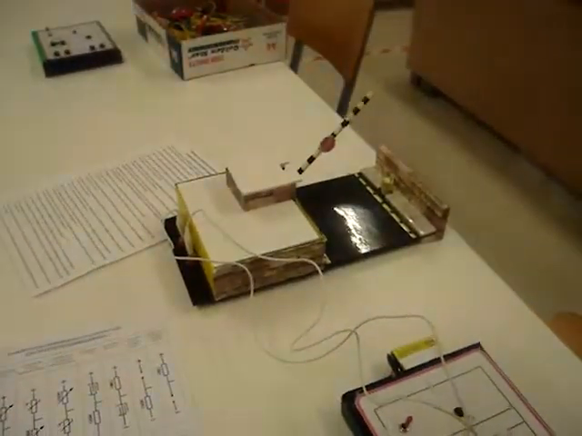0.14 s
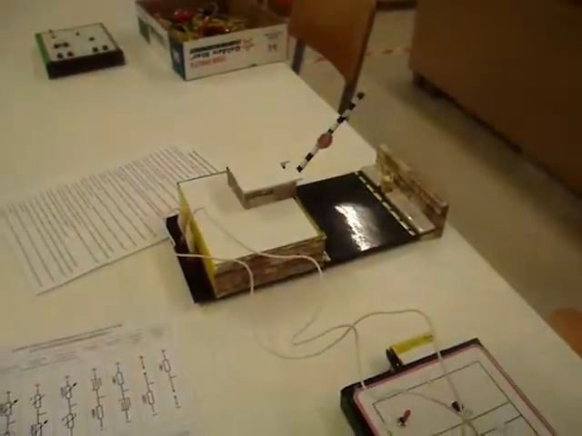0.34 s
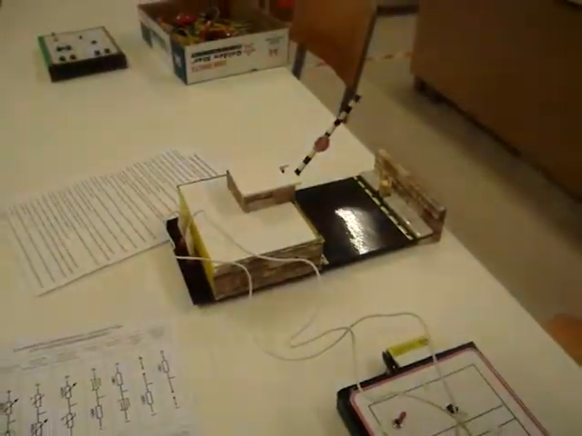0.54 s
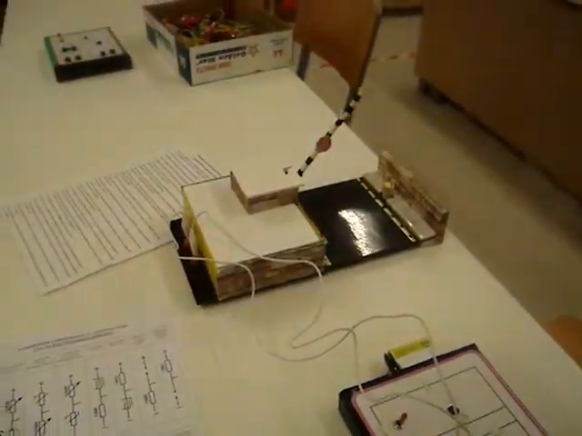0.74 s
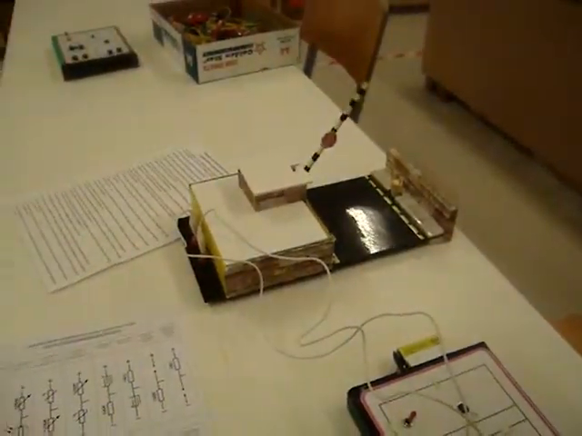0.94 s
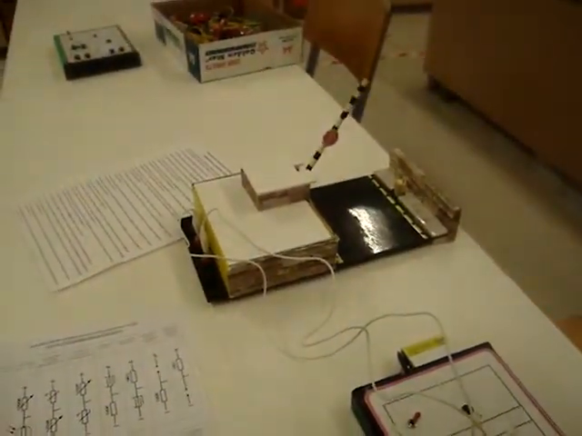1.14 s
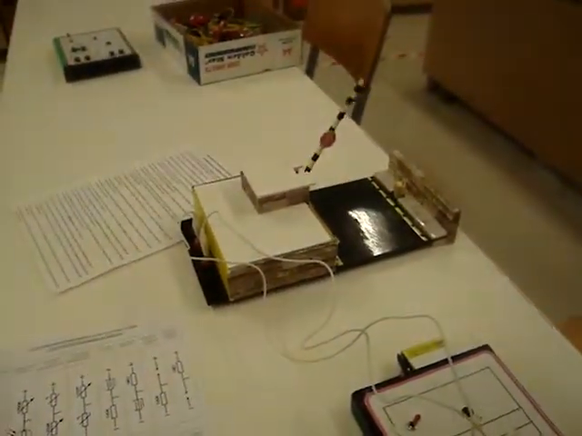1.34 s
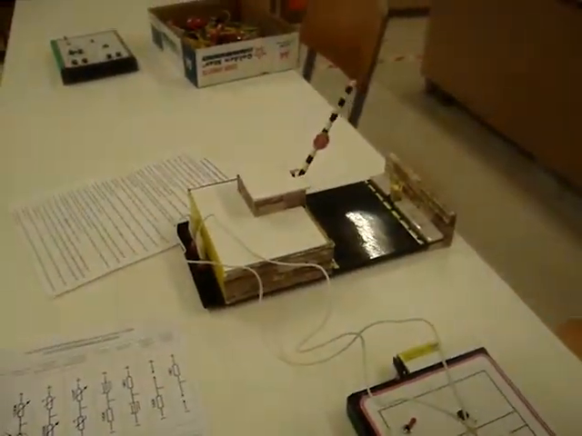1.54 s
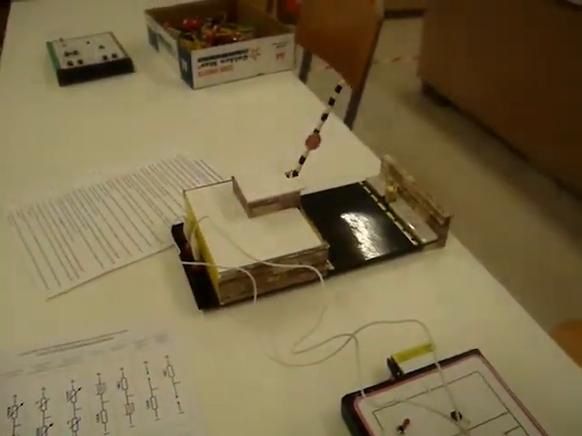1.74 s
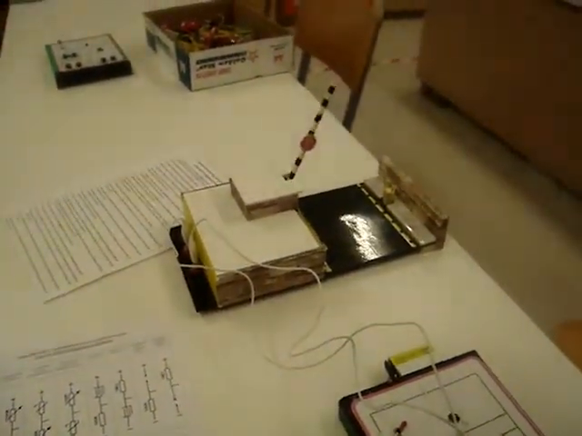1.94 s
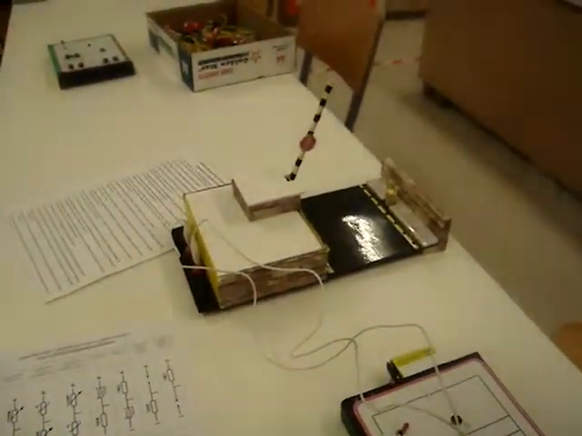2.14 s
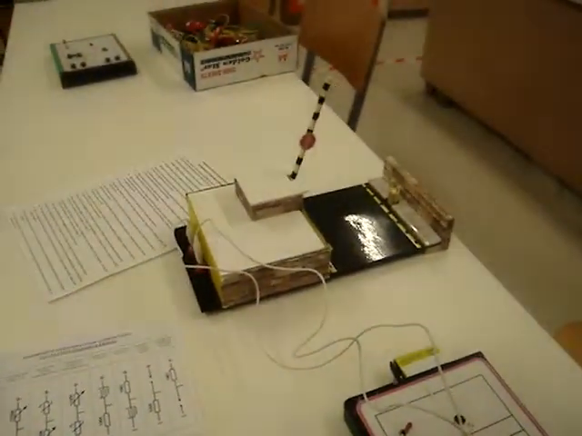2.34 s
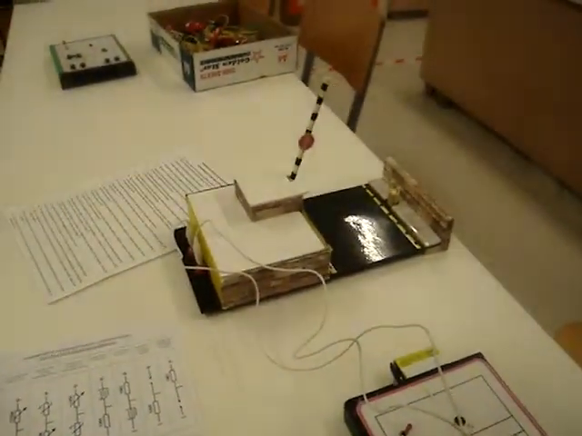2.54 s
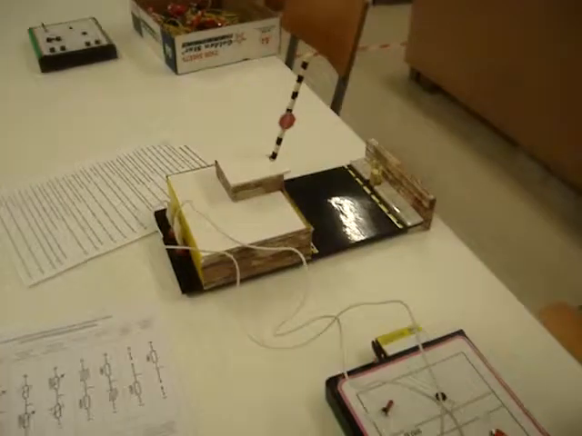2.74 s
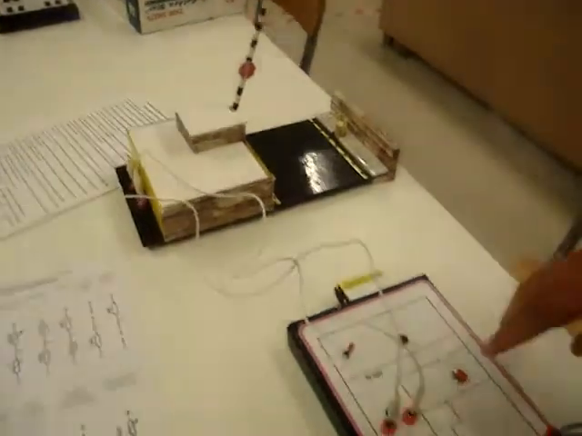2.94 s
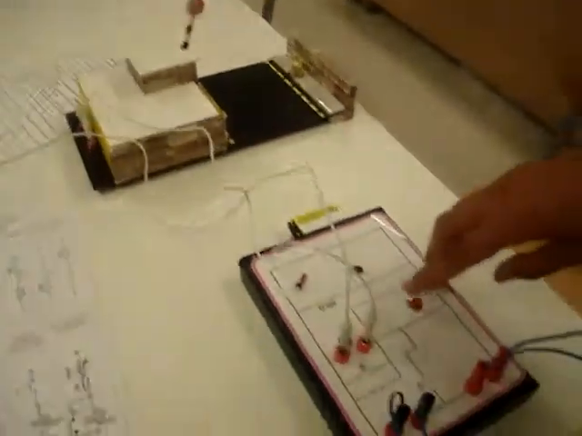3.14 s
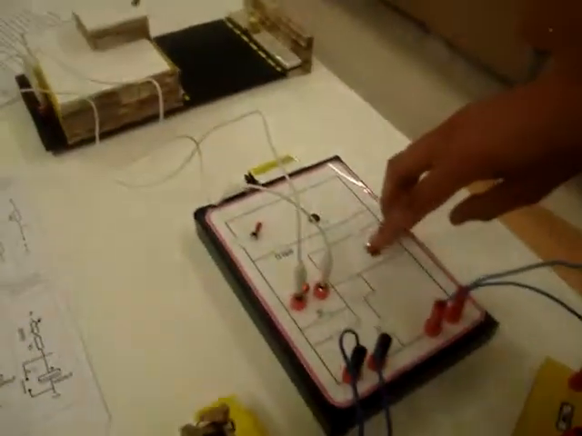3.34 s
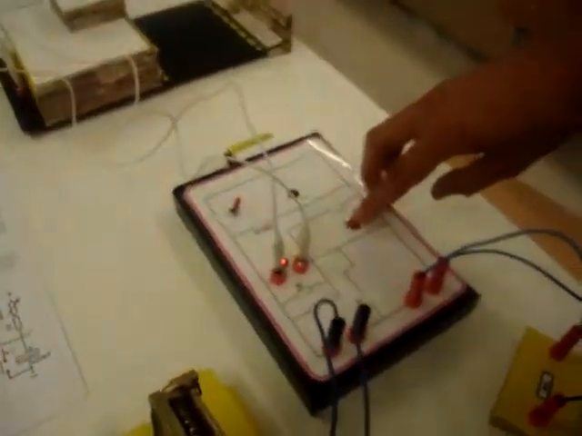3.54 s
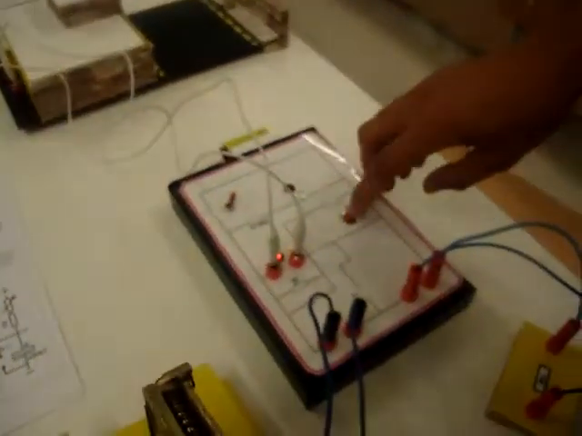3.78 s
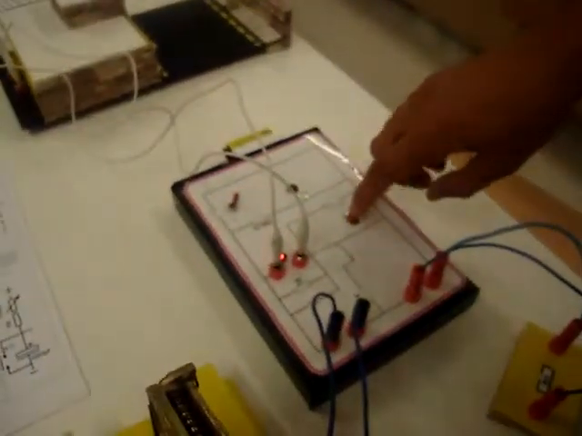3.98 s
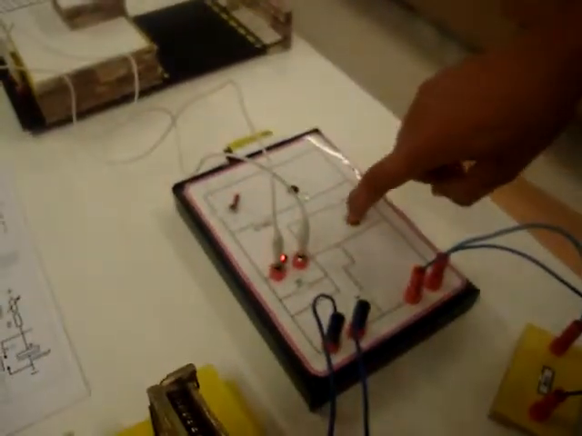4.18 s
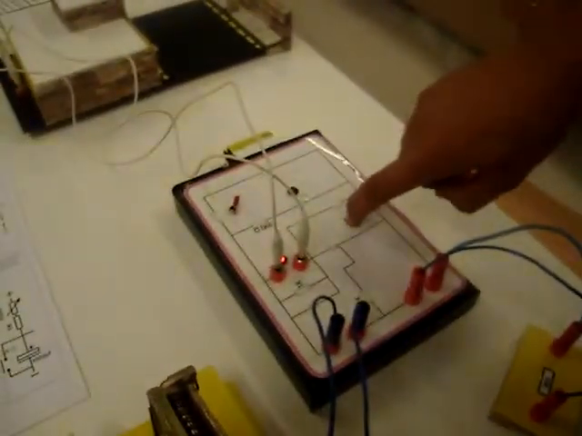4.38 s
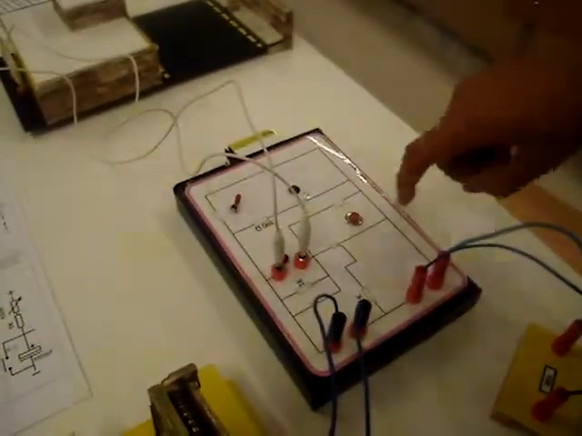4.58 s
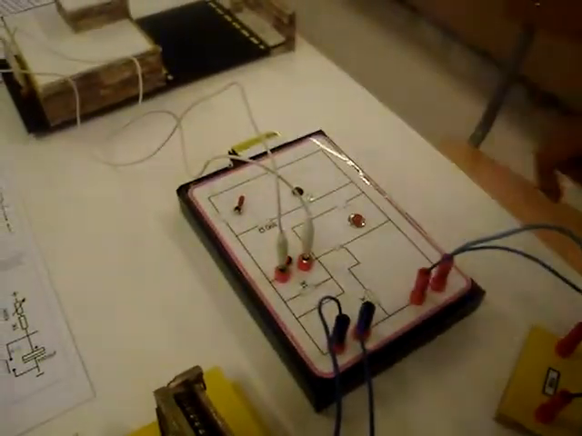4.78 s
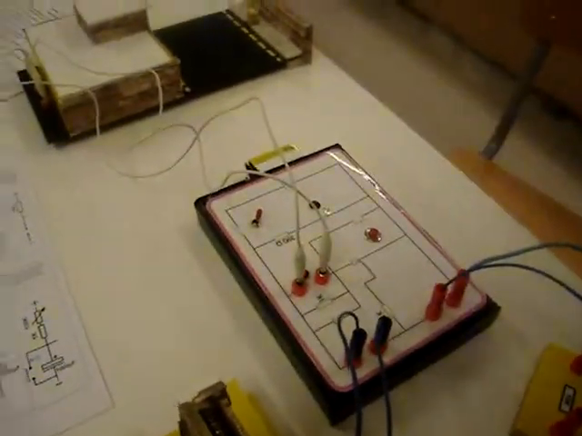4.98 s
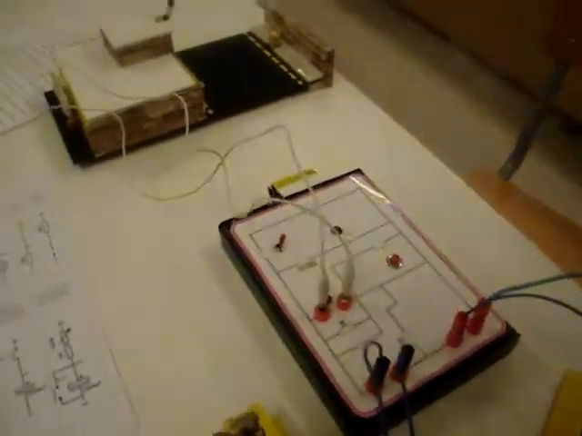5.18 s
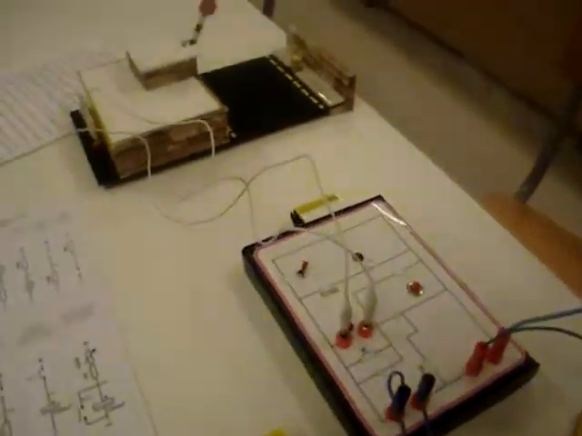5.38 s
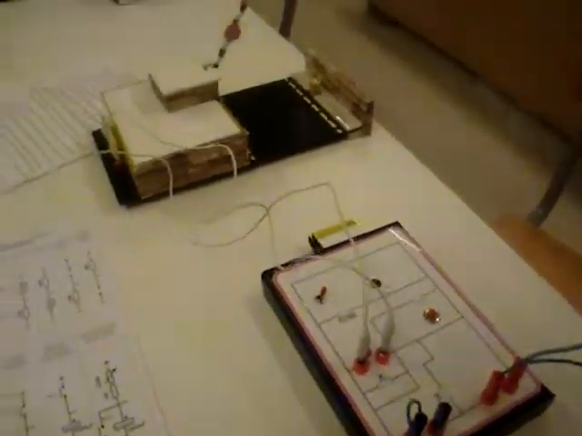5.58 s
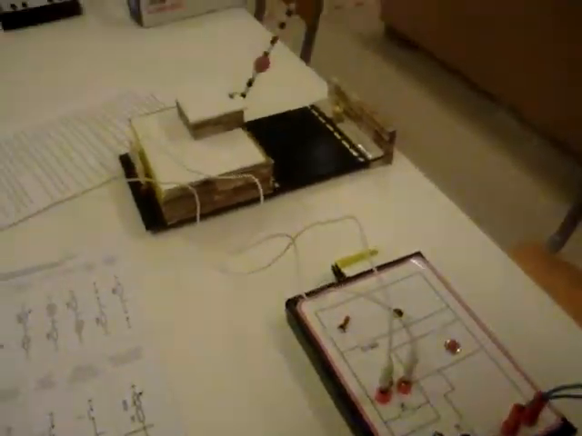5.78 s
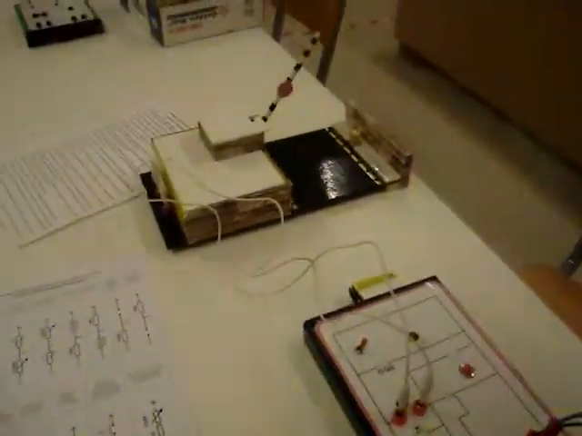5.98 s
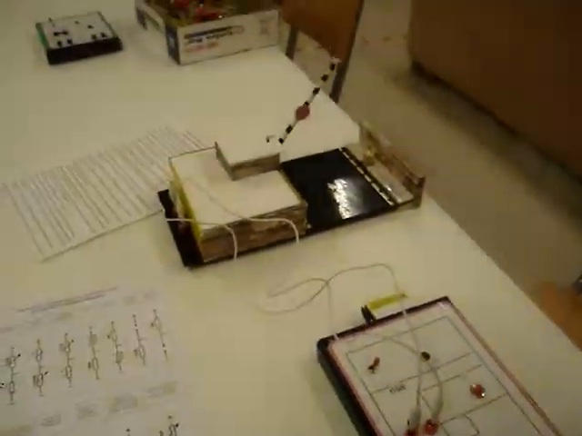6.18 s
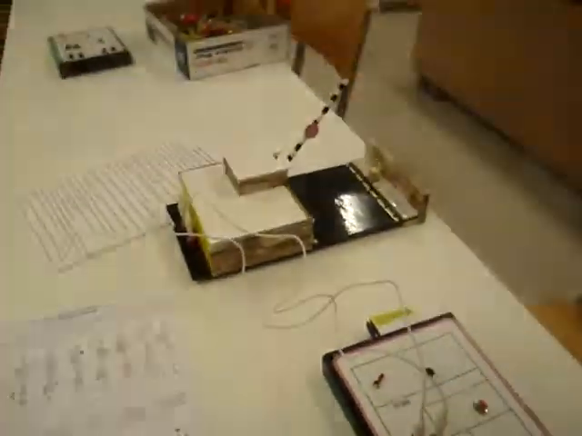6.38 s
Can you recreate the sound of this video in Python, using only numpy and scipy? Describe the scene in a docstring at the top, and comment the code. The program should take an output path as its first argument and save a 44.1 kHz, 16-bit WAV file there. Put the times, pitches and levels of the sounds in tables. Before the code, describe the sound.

From the start, a small electric motor whirs close by, raising a model barrier. Its loose gears clatter rapidly over a thin whine and the buzz of a cardboard base, with many sharp, irregular knocks. The motor strains slightly near 1.9 seconds, then coasts to rest between 2.3 and 2.7 seconds. In the pause there is only soft room air and faint mains hum, and a sleeve brushes lightly twice around 3 seconds. Just after 4 seconds a fingertip taps softly, a button scrapes, and a relay snaps twice in quick succession at about 4.2 seconds. A lighter click comes near 4.55 seconds and the motor quickly spins up again to lower the arm. It runs steadily, with a brighter fizz and only a few knocks, until the end at about 6.4 seconds. The classroom adds a short echo.

```python
"""Loose gears rattle and knock as a small motor raises a model barrier on a cardboard base.
The pinion slaps its wheel once a turn, six jolts a turn shake the cardboard, and a whine follows the
rotor's speed. The arm binds near the top, then the drive coasts to rest. In the pause a sleeve brushes,
a finger works a button and a relay clicks over; the motor spins up again to lower the arm.
The classroom rings briefly around it all, over soft air and mains hum."""
import sys
import numpy as np
from scipy import signal
from scipy.fft import rfft, irfft
from scipy.io import wavfile
from scipy.ndimage import uniform_filter1d

SR = 44100
rng = np.random.default_rng(int(sys.argv[2]) if len(sys.argv) > 2 else 0)


def wav_record(signal):
    """Record a signal, one row per channel, as 16-bit PCM in the file named by sys.argv[1]."""
    frames = np.transpose(np.atleast_2d(signal))
    bounded = np.clip(frames, -1, 1)
    # unit amplitude maps onto the largest positive 16-bit level
    quanta = np.round(bounded * 32767).astype(np.int16)
    wavfile.write(sys.argv[1], SR, quanta)


N = 283122
TIME = np.arange(N) / SR

# motor runs, raising then lowering: on t/s, off t/s, full speed/(turns per s)
MOTOR_RUNS = [(-3, 2.33, 99.1), (4.55, 9, 97.9)]
# gearbox resonances: f/Hz, width/Hz, relative level/dB
GEARBOX_MODES = [(2890, 310, -7.5), (3112, 270, -1.5), (3265, 370, -9), (3750, 390, -15.5),
                 (4900, 2330, -12), (6544, 910, -11), (7190, 1670, -17)]
# caught teeth breaking free: t/s, relative peak level/dB
TOOTH_KNOCKS = [(0.066, -11), (0.2575, -13.5), (0.3007, -12), (0.320, -7.5), (0.36, -11), (0.472, -10),
                (0.623, -9.5), (0.7718, -8.5), (0.875, -9), (0.9757, -8.5), (1.3687, -10), (1.42, -7.5),
                (1.5296, -11), (1.622, -11), (1.739, -12.5), (1.802, -13), (1.8325, -10), (1.8985, -12.5),
                (1.942, -8.5), (2.0482, -12.5), (2.0982, -12.5), (2.2006, -7.5), (2.3483, -12),
                (2.3933, -14), (2.4328, -15.5), (4.9227, -10.5), (4.988, -9.5), (5.5209, -10.5)]


def from_db(db):
    """Decibels to gain."""
    return 10 ** (np.asarray(db) / 20)


def rms_one(x):
    """Scale to unit power."""
    return x / np.sqrt(np.mean(x ** 2) + 1e-20)


def in_time(rows):
    """Each column of a curve table at every sample."""
    times, *columns = np.transpose(rows)
    return [np.interp(TIME, times, column) for column in columns]


def this_run(rows):
    """Each column of a table with one row per motor run, at every sample."""
    lowering = TIME >= MOTOR_RUNS[1][0]
    return np.array(rows)[lowering.astype(int)].T


def at_hz(points, hz):
    """Read a table on a log-frequency axis."""
    f, value = np.transpose(points)
    return np.interp(np.log(hz + 1e-9), np.log(f), value)


def gate(start, stop, edge_s=.002):
    """1 from start to stop, with soft edges."""
    return np.clip(np.minimum(TIME - start, stop - TIME) / edge_s + .5, 0, 1)


def drift(rate):
    """A random wander that heads for a new value `rate` times a second."""
    knots = rng.standard_normal(4000)
    return np.interp(TIME * rate, np.arange(len(knots)), knots)


def soften(x, hz, kind="low", order=2):
    """Butterworth low- or high-pass."""
    return signal.sosfilt(signal.butter(order, hz, kind, fs=SR, output="sos"), x + 1e-18)


def bandpass(x, low_hz, high_hz):
    """Butterworth band-pass."""
    return signal.sosfilt(signal.butter(2, [low_hz, high_hz], "band", fs=SR, output="sos"), x + 1e-18)


def ring(drive, modes):
    """Rough contact feeds each resonance its own noise; modes are f/Hz, width/Hz, relative level/dB."""
    out = 0
    for hz, width, db in modes:
        spread = np.exp(width / hz / 2)
        band = bandpass(drive * rng.standard_normal(N), hz / spread, hz * spread)
        out = out + from_db(db) / np.sqrt(width) * band
    return out


def bursts(times, sizes, decay_s, rise_s=.00017):
    """Contact force: a quick swell at each time that dies away."""
    force = np.zeros(N)
    starts = np.clip(np.round(times * SR).astype(int), 0, N - 1)
    np.add.at(force, starts, sizes)
    rise = np.exp(-1 / (rise_s * SR))
    force = signal.lfilter([1 - rise], [1, -rise], force + 1e-18)
    return signal.lfilter([1], [1, -np.exp(-1 / (decay_s * SR))], force)


def blows(rows, modes, decay_s, rise_s):
    """Single blows on a body, each brought to its own peak level."""
    times, db = np.transpose(sorted(map(tuple, rows)))
    sound = ring(bursts(times, from_db(db), decay_s, rise_s), modes)
    starts = np.round(times * SR).astype(int)
    gains = from_db(db) / np.maximum.reduceat(np.abs(sound), starts)
    latest_blow = np.maximum(np.searchsorted(starts, np.arange(N), "right") - 1, 0)
    return sound * gains[latest_blow]


def steady(x, window=9000):
    """Even out the slow level and keep the grain."""
    power = np.maximum(uniform_filter1d(x ** 2, window), 0)
    return x / np.sqrt(power + 1e-4 * np.mean(x ** 2))


def contacts(turns, count, scatter_s):
    """Samples at which the rotor passes `count` even marks a turn, and their jittered times."""
    at = np.flatnonzero(np.diff(np.floor(turns * count)))
    return at, at / SR + scatter_s * rng.standard_normal(len(at))


def rotor(leap_s=.048, creep_s=.32, creep_share=.158, coast_s=.37, bind_at_s=1.87, bind_width_s=.25):
    """The rotor leaps, then creeps to full speed, sags as the arm binds and coasts after switch-off."""
    on, off, full_speed = this_run(MOTOR_RUNS)
    age = TIME - on
    leap = (1 - creep_share) * np.exp(-age / leap_s)
    creep = creep_share * np.exp(-age / creep_s)
    spin_up = np.maximum(1 - leap - creep, 0)
    coast = np.clip(1 - (TIME - off) / coast_s, 0, 1)
    load = np.exp(-((TIME - bind_at_s) / bind_width_s) ** 2)
    pace = spin_up * coast * (1 - .058 * load)
    speed = full_speed * pace * (1 + .00063 * drift(14))   # turns per s
    vigour = pace + .23 * (1 - spin_up)   # starting torque adds to the shaking
    return speed, vigour, load, age


def gear_clatter(turns, uneven_db, wobble_db=1.5, scrape=.054):
    """Once a turn the pinion grazes, then slaps its 5:1 wheel; the wheel's wobble sways the force."""
    at, times = contacts(turns, count=1, scatter_s=.0004)
    wobble = np.sin(2 * np.pi * turns[at] / 5)
    chance = np.clip(rng.standard_normal(len(at)), -2, 2)
    sizes = from_db(uneven_db[at] * chance + wobble_db * wobble)
    slap = bursts(times, sizes, decay_s=.0016, rise_s=.0006)
    graze = .5 * bursts(times - .0018, sizes, decay_s=.0012, rise_s=.0004)
    return steady(ring(slap + graze + scrape, GEARBOX_MODES))


def base_rattle(turns, uneven_db=4, swing_db=4.5):
    """Six jolts a turn shake the cardboard, hardest just after the pinion's slap."""
    # cardboard resonances: f/Hz, width/Hz, relative level/dB
    cardboard_modes = [(282, 12, -22), (340.4, 51, -15.5), (439, 27.3, -13.5), (527, 66, -2), (573, 56, -5),
                       (808, 140, -2), (919.4, 37.6, -7), (1049, 79, -4.5), (1157, 144, -2),
                       (1389, 134, -9), (1598, 100, -5.5), (1770, 400, -0.5), (2104, 230, -4),
                       (2405, 410, 0), (3120, 610, 3.5), (3780, 210, -5.5), (4450, 1500, -3)]
    at, times = contacts(turns, count=6, scatter_s=.00023)
    swing = np.cos(2 * np.pi * (turns[at] - .15))
    sizes = from_db(uneven_db * rng.standard_normal(len(at)) + swing_db * swing)
    return steady(ring(bursts(times, sizes, decay_s=.00065), cardboard_modes))


def mount_throb(turns, lag_s=.0015):
    """The motor rocks in its mount just after each slap."""
    _, times = contacts(turns, count=1, scatter_s=.0001)
    return steady(ring(bursts(times + lag_s, 1, decay_s=.0018), [(1022, 597, 0)]))


def motor_tones(turns, speed, waver_db=4, flutter_rad=.067):
    """Hum, gear whine and brush whistle, locked to the rotor and fading as it slows."""
    # partials at full speed: multiple of rotor speed, raising level/dB, lowering level/dB
    partials = [(1, -64, -63), (2, -65, -66), (6, -49, -45), (9, -48, -56), (11, -55, -46), (12, -49, -50),
                (16.2, -50, -52), (20, -50, -60), (21.4, -53, -60), (24, -60, -47), (29, -49, -56),
                (29.6, -48, -56), (32, -50, -47), (38.2, -53, -60), (83, -90, -63), (86, -90, -65),
                (89, -90, -66), (92, -90, -61), (95, -90, -69), (98, -90, -69), (103, -90, -71)]
    # the tenth multiple sings while the load is light: t/s, level/dB
    gear_song = [(0, -36), (.4, -39), (.8, -34.5), (.9, -51), (1.25, -43), (1.5, -50)]
    lines = [(multiple, this_run(levels)) for multiple, *levels in partials]
    lines.append((10, in_time(gear_song)[0]))
    out = 0
    for multiple, db in lines:
        shake = min(multiple / 10, 1)   # play in the gears roughens the low hum least
        gain = from_db(db + waver_db * shake * drift(45))
        phase = 2 * np.pi * turns * multiple + flutter_rad * shake * drift(60)
        out = out + gain * np.sin(phase)
    fade = np.clip((speed - 40) / 57, 0, 1) ** 2
    return np.sqrt(2) * out * fade


def tooth_snags(hold_s=.016, release_s=.0056):
    """1 while teeth are caught, from just before each knock until just after it."""
    return np.minimum(sum(gate(t - hold_s, t + release_s) for t, _ in TOOTH_KNOCKS), 1)


def tooth_knocks(dull_hz=5000):
    """Caught teeth break free and ring the gearbox."""
    knocks = blows(TOOTH_KNOCKS, GEARBOX_MODES, decay_s=.0043, rise_s=.00042)
    return from_db(-.9) * soften(knocks, dull_hz, order=1)


def gear_chatter():
    """Extra dB of the short bouts in which the gears chatter harder on every turn."""
    # bouts: start t/s, length/s, boost/dB
    bouts = [(1.629, 0.033, 5.5), (2.132, .16, 2.5)]
    return sum(db * gate(t, t + length) for t, length, db in bouts)


def shaft_rub(attack_s=.07, fade_db_per_s=48):
    """The coasting shafts rub dryly once the current is off."""
    coasting_s = np.maximum(TIME - MOTOR_RUNS[0][1], 0)
    envelope = np.minimum(coasting_s / attack_s, 1) * from_db(-37 - fade_db_per_s * coasting_s)
    return envelope * rms_one(ring(1, [(1100, 380, -11), (1740, 190, 1), (2090, 210, -4.5)]))


def brush_fizz(age, inrush_db=5, inrush_s=1):
    """The motor's brushes fizz brightly, more so until the starting current dies away."""
    fizz = rms_one(ring(1, [(4400, 240, .5), (7650, 360, -13), (8770, 850, -6.5)]))
    return from_db(inrush_db * np.exp(-age / inrush_s)) * fizz


def motor(seat_s=.083):
    """The rotor times the whole drive; clatter, rattle and fizz grow as powers of its vigour."""
    # each run at full speed: clatter level/dB, rattle level/dB, throb level/dB, fizz level/dB,
    # scatter of slaps/dB
    run_levels = [(-29.5, -31, -38.5, -83.5, 2), (-31.5, -32.5, -41.5, -52.5, 0.5)]
    clatter_db, rattle_db, throb_db, fizz_db, uneven_db = this_run(run_levels)
    speed, vigour, load, age = rotor()
    turns = np.cumsum(speed) / SR
    caught = tooth_snags()
    seated = np.exp(-age / seat_s)   # the gears are pressed tight at the start
    strain_db = -1.5 * load - 2 * seated - 5 * caught
    clatter_gain = vigour ** 2.5 * from_db(clatter_db + strain_db + gear_chatter())
    clatter = gear_clatter(turns, uneven_db + 1.5 * load)   # loaded gears slap less evenly
    gears = clatter_gain * clatter + tooth_knocks()
    shaking = vigour ** 1.74 * from_db(-caught)   # a snag ducks the base by 1 dB
    base = shaking * (from_db(rattle_db) * base_rattle(turns) + from_db(throb_db) * mount_throb(turns))
    fizz_gain = vigour ** 2.2 * from_db(fizz_db)
    whine = motor_tones(turns, speed) + shaft_rub() + fizz_gain * brush_fizz(age)
    return gears, base, whine


def room_tone(whir_hz=1390, whir_width_hz=80):
    """Room air, a thin narrow whir and the gently wavering hum of mains and electronics."""
    # fader moves: t/s, air level/dB, whir level/dB
    faders = [(0, -45, -68), (2.7, -54, -67), (3.05, -53.5, -59), (3.4, -56.5, -59), (3.8, -58.5, -61.5),
              (4.15, -56.5, -73.5), (6.42, -48, -75)]
    # colour of the air: f/Hz, relative level/dB
    air_spectrum = [(30, -15.5), (70, -9.5), (130, -8.5), (300, -7.5), (550, -3.5), (900, -6), (1250, -4),
                    (1800, -10), (3500, -12), (7500, -14), (10000, -23)]
    # mains and electronics: f/Hz, level/dB
    hum_tones = [(200, -74), (300, -72), (400, -66), (500, -65), (602, -73), (802, -72), (1400, -71),
                 (4463, -83), (7892, -83), (8129, -76)]
    air_db, whir_db = in_time(faders)
    colour = from_db(at_hz(air_spectrum, np.fft.rfftfreq(N, 1 / SR)))
    air = rms_one(irfft(rfft(rng.standard_normal(N)) * colour, N))
    whir = rms_one(ring(1, [(whir_hz, whir_width_hz, 0)]))
    hum = 0
    for hz, db in hum_tones:
        gain = np.sqrt(2) * from_db(db + .56 * drift(2.9))
        hum = hum + gain * np.sin(2 * np.pi * (hz * TIME + rng.random()))
    return from_db(air_db) * air + from_db(whir_db) * whir + hum


def classroom(x, gap_s=.0047, dull_hz=7000):
    """A short diffuse reverb that lingers longest in the upper mids."""
    # reverb decay: f/Hz, time to fall 60 dB/s
    decay_times = [(150, 0.2), (1000, 0.72), (2500, 0.93), (5000, 0.5), (10000, 0.67)]
    age = TIME[:SR]
    edges = np.geomspace(100, 12000, 9)
    tail = 0
    for low, high in zip(edges, edges[1:]):
        t60 = at_hz(decay_times, np.sqrt(low * high))
        tail = tail + bandpass(rng.standard_normal(SR), low, high) * from_db(-60 * age / t60)
    tail = tail * (age > gap_s)
    tail = tail * np.sqrt(2 * edges[-1] / SR / np.sum(tail ** 2))   # about unity gain in its band
    return signal.fftconvolve(x, soften(tail, dull_hz, order=1))[:N]


def dull_bumps(dull_hz=110):
    """Soft low bumps, each a push of pressure that swings back slowly."""
    # pushes: t/s, relative level/dB
    pushes = [(1.53, -32.5), (2.213, -32.5)]
    times, db = np.transpose(pushes)
    pressure = bursts(times, from_db(db), decay_s=.023)
    return soften(soften(pressure, dull_hz), 22, "high")


def sleeve_brushes():
    """A sleeve brushes by in faint, short puffs of hiss."""
    # strokes: t/s, relative peak level/dB
    strokes = [(2.9078, -33.5), (3.0614, -39)]
    return from_db(-3.5) * blows(strokes, [(2000, 2200, 4), (5100, 2100, 2)], decay_s=.0048, rise_s=.0013)


def finger_presses():
    """A fingertip lands on the switch box with soft, low taps."""
    # presses: t/s, peak level/dB
    presses = [(4.032, -48), (4.091, -46), (4.152, -42), (4.525, -38.5)]
    return blows(presses, [(338, 280, 9), (900, 600, -5)], decay_s=.023, rise_s=.002)


def button_slides():
    """The button scrapes briefly along its guide."""
    # slides: t/s, peak level/dB
    slides = [(4.177, -23), (4.209, -22.5), (4.247, -30), (4.539, -21.5)]
    guide_modes = [(844, 1050, -5.5), (3370, 1800, -1), (6240, 1800, -3.5)]
    return blows(slides, guide_modes, decay_s=.0034, rise_s=.0034)


def relay_clicks():
    """Relay contacts snap over and ring the switch box."""
    # snaps: t/s, relative peak level/dB
    snaps = [(4.1985, -13.5), (4.235, -14.5), (4.560, -23)]
    # switch box resonances: f/Hz, width/Hz, relative level/dB
    box_modes = [(450, 260, -11), (860, 190, -6), (1625, 390, -7), (2230, 450, -9), (3150, 290, -7.5),
                 (4460, 440, -3.5), (6880, 1300, -0.5), (7830, 290, -13.5), (8800, 1100, -23)]
    return from_db(.5) * blows(snaps, box_modes, decay_s=.0027, rise_s=.00034)


def scene():
    """Motor and switch on the table; the broad base feeds the room more than the small gears do."""
    gears, base, whine = motor()
    switch = relay_clicks() + button_slides()
    near = gears + base + whine + switch + finger_presses() + sleeve_brushes() + dull_bumps()
    reverb_send = from_db(-10.5) * gears + from_db(-3) * base + from_db(-5) * switch
    return (near + classroom(reverb_send) + room_tone())[None]


def record(dry, cutoff_hz=10000):
    """A steep low-pass takes off the top."""
    return signal.sosfilt(signal.ellip(12, .2, 80, cutoff_hz, fs=SR, output="sos"), dry)


dry = scene()
out = record(dry)
wav_record(out)
```